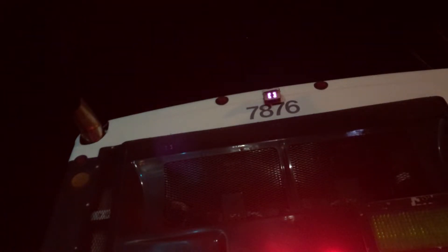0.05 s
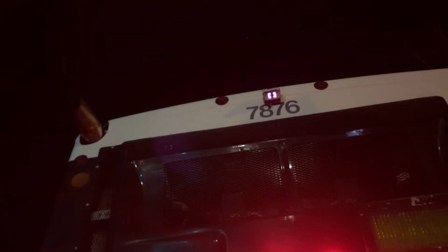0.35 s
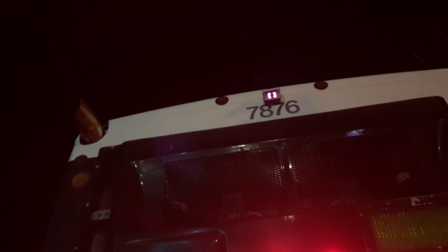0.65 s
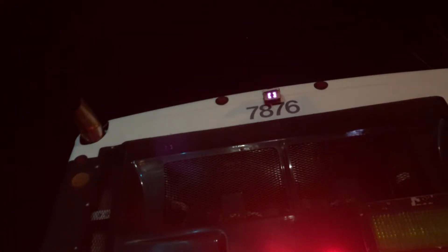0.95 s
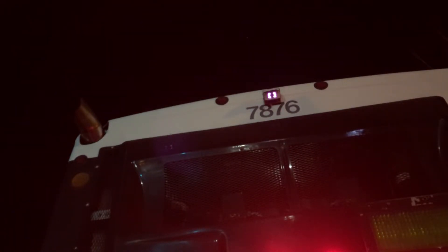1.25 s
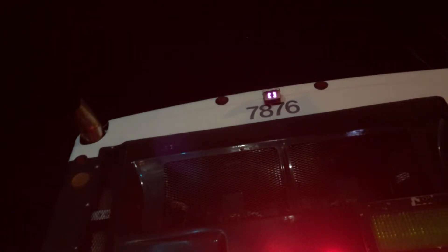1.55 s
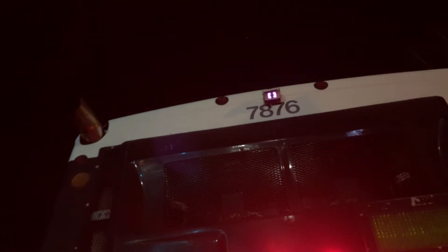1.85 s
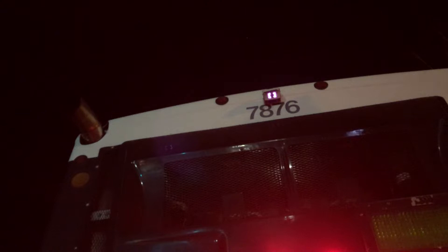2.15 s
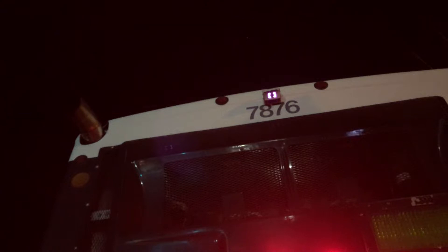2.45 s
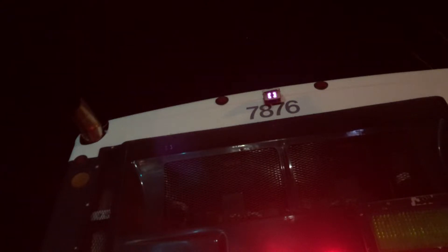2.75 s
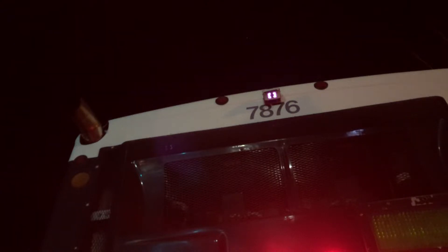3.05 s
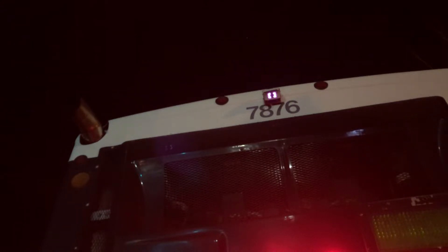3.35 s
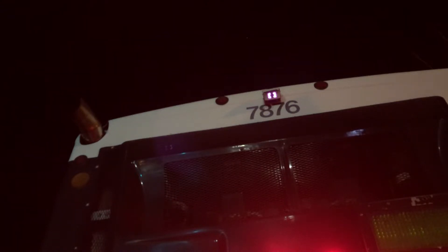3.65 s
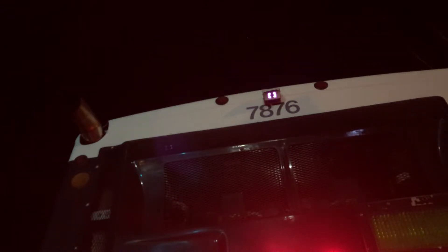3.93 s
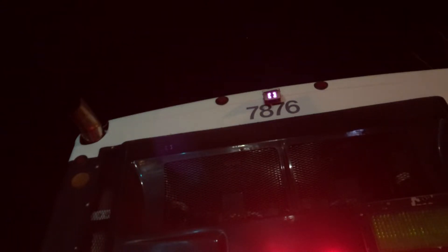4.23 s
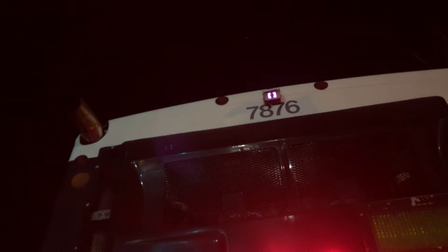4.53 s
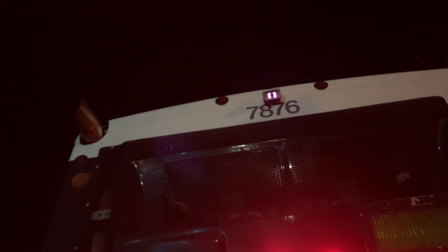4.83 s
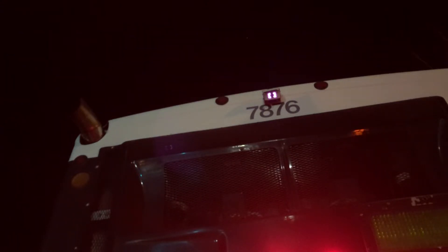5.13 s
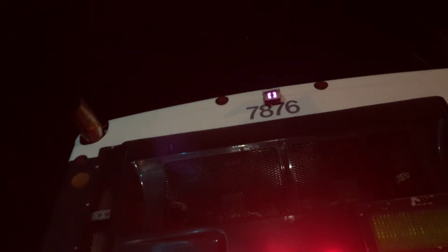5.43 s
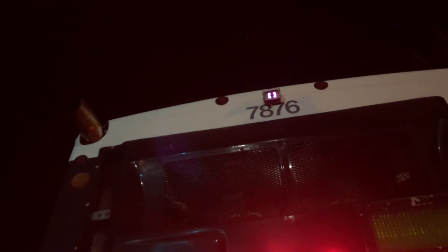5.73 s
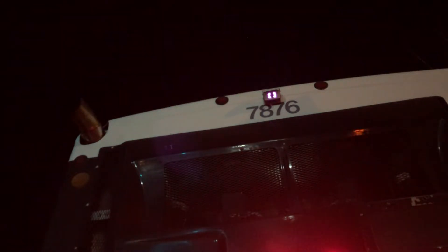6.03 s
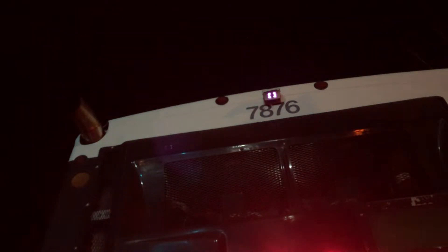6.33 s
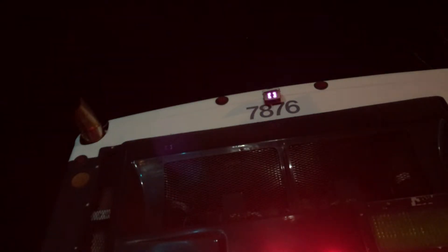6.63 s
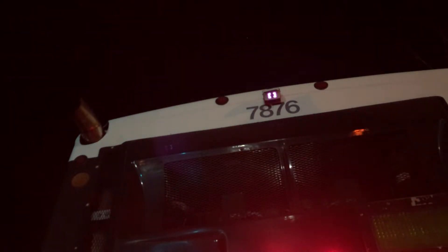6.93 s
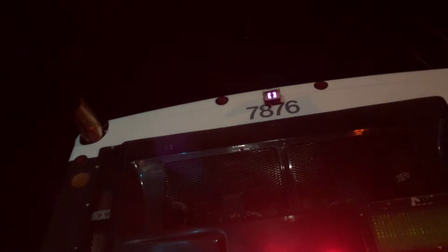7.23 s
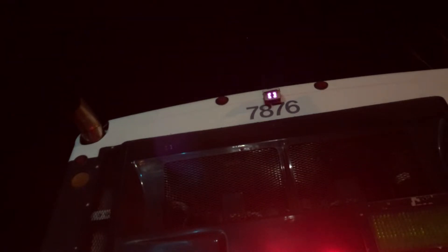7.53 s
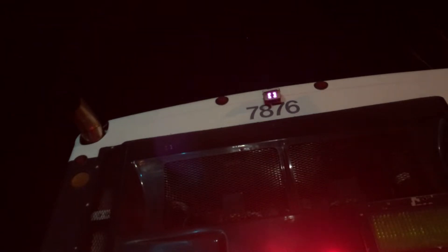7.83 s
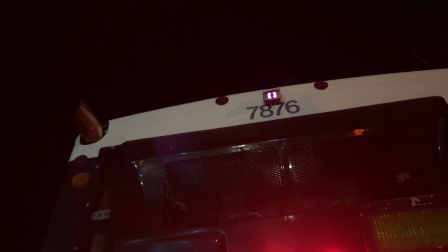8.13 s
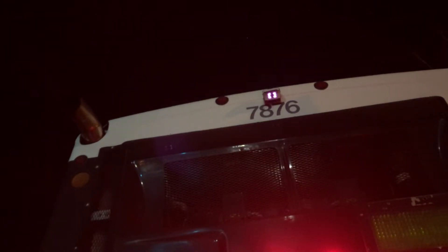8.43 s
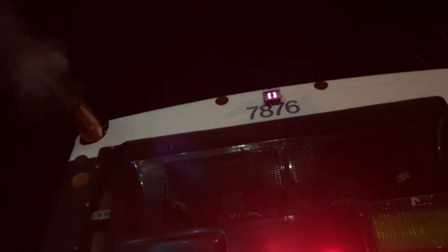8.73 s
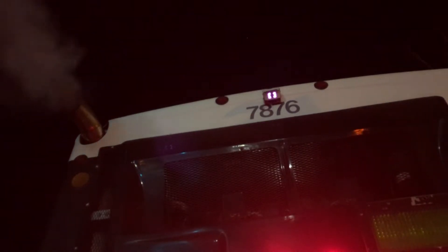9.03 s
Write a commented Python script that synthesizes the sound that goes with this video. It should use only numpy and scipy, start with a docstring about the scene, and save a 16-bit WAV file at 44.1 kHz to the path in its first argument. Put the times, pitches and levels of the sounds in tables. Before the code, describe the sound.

Faint distant traffic, then a starter slams in and grinds, and a bus's diesel engine fires, knocking and clattering as it speeds up.

```python
"""A quiet yard at night, close behind the engine bay of a cold diesel bus as it is started.
A few small clicks, then the starter slams in and grinds, its gear-mesh tone sagging under each compression.
The cylinders catch one by one and the engine runs up. Each firing is an impulse that excites resonators:
knocks ring the block, the exhaust thumps, gears clatter and gas spits. As the pulses quicken they merge
into a rising bass note."""
import sys
import numpy as np
from scipy import signal
from scipy.fft import rfft, irfft, next_fast_len
from scipy.io import wavfile
from scipy.ndimage import uniform_filter1d

SR = 44100
rng = np.random.default_rng(int(sys.argv[2]) if len(sys.argv) > 2 else 0)


def generate_wav(sig):
    """Save sig (samples, or channels by samples) to the path in sys.argv[1] as 16-bit PCM at SR."""
    pcm = np.round(np.clip(np.atleast_2d(sig).T, -1, 1) * 32767).astype(np.int16)
    wavfile.write(sys.argv[1], SR, pcm)


N = 400428
T = np.arange(N) / SR


def undb(db):
    """Decibels to amplitude ratio."""
    return 10 ** (np.asarray(db) / 20)

def unit(x):
    """Normalisation to rms 1."""
    return x / np.sqrt(np.mean(x ** 2))

def curves(table):
    """Linear interpolation of each column over time."""
    s, *columns = np.transpose(table)
    return [np.interp(T, s, c) for c in columns]

def between(start, stop, fade=0.013):
    """A gate with linear ramps."""
    return np.clip((T - start) / fade, 0, 1) * np.clip((stop - T) / fade, 0, 1)

def swell(peak_s, rise, fall):
    """A Gaussian hump with a separate width on each side."""
    return np.exp(-((T - peak_s) / np.where(T < peak_s, rise, fall)) ** 2)

def walk(rate):
    """Smooth random modulation of rms 1."""
    k = int(SR / rate)
    steps = np.repeat(rng.standard_normal(N // k + 1), k)
    return unit(uniform_filter1d(uniform_filter1d(steps, k), k)[:N])

def colour(x, spectrum):
    """Minimum-phase filtering by the folded cepstrum; output rms 1."""
    hz, db = np.transpose(spectrum)
    size = 2 * next_fast_len(N)
    f = np.maximum(np.arange(size // 2 + 1) * SR / size, 1)
    cepstrum = irfft(np.log(undb(np.interp(np.log(f), np.log(hz), db))))
    cepstrum[1:size // 2] *= 2
    cepstrum[size // 2 + 1:] = 0
    return unit(irfft(rfft(x, size) * np.exp(rfft(cepstrum)))[:N])

def noise(spectrum):
    """Turbulence as filtered Gaussian noise."""
    return colour(rng.standard_normal(N), spectrum)

def grit(spectrum, rate, spread_db):
    """Shot noise: dense tiny impacts of uneven size, filtered."""
    hits = (rng.random(N) < rate / SR) * rng.choice([-1, 1], N)
    return colour(hits * undb(spread_db * np.minimum(rng.standard_normal(N), 2)), spectrum)

def pulses(times, gains):
    """An impulse train."""
    return np.bincount(np.clip(np.asarray(times) * SR, 0, N).astype(int), gains, N + 1)[:N]

def bursts(hits, rise, decay):
    """Incoherent summation: each impulse opens an envelope, and their energies add."""
    t = T[:SR // 2]
    shape = (1 - np.exp(-(t / rise) ** 2)) * np.exp(-t / decay)
    return np.sqrt(np.abs(signal.fftconvolve(hits ** 2, (shape / shape.max()) ** 2)[:N]))

def cycles(hz, wander, rate):
    """Phase in cycles: the integral of a randomly wavering frequency."""
    return np.cumsum(hz * (1 + wander * walk(rate))) / SR

def harmonic(phase, k):
    """The k-th harmonic, at a random starting phase."""
    return np.sin(2 * np.pi * (k * phase + rng.random()))

def ring(hits, modes, rise, wander):
    """Modal resonance: blows feed damped modes, whose pitch and strength waver as the body shakes."""
    out = 0
    for hz, t60, db in modes:
        tone = harmonic(cycles(hz, wander, 70), 1)
        out = out + undb(db + 2 * walk(25)) * tone * bursts(hits, rise, t60 / np.log(1000))
    return out


# spectrum of distant traffic: frequency_hz, gain_db
TRAFFIC_SPECTRUM = [(13, -42), (22, -31), (49, 0), (82, -4), (121, 2), (168, -5), (233, -2.5), (352, -12),
                    (592, -10), (1870, -29), (2530, -41.5), (2990, -43.5), (3240, -44), (3520, -46),
                    (15500, -56.5)]
# drone of a far vehicle: time_s, pitch_hz, level_db
VEHICLE_DRONE = [(2.3, 342, -77), (2.43, 332, -46), (2.6, 318.5, -48), (2.76, 263, -50), (2.9, 235, -80)]
# thin electrical whine: time_s, level_db
WHINE_LEVELS = [(.38, -72), (.47, -81), (.6, -72), (4.6, -74), (5.9, -79)]

def yard(recede_db_per_s=.08, whine_hz=3143):
    """Superposed background sources: traffic, a narrow-band hum, a sinking drone and a pure whine."""
    traffic = noise(TRAFFIC_SPECTRUM)
    traffic *= undb(-44.5 - recede_db_per_s * T + .65 * walk(1.25) + .5 * walk(8.9))
    hum = noise([(400, -35.5), (560, -15), (592, .5), (625, -4), (850, -39), (3000, -83)]) * undb(-63)
    hz, db = curves(VEHICLE_DRONE)
    drone = np.sin(2 * np.pi * cycles(hz, .013, 39.6)) * undb(db + 3.1 * walk(34.95)) * between(2, 3.5)
    whine = np.sqrt(2) * np.sin(2 * np.pi * whine_hz * T) * undb(curves(WHINE_LEVELS)[0])
    return traffic + hum + drone + whine


# clicks and scuffs around the bus: start_s, level_db, decay_s, centre_hz
SMALL_IMPACTS = [(1.322, -61, 0.0028, 9000), (1.42, -69, 0.067, 2800), (1.508, -63.5, 0.031, 7500),
                 (2.179, -56, 0.022, 2600), (2.27, -75, .03, 7000), (3.683, -56, 0.02, 2780),
                 (3.749, -60, .025, 2600), (3.78, -68, .035, 6500), (4.452, -58, 0.024, 3200),
                 (4.515, -64, .03, 2800), (4.548, -66, 0.039, 7500)]

def clicks(tail_db=-17, tail_s=.072):
    """Brief contacts radiate broad bands of noise, each with a fast decay and a soft tail."""
    out = np.zeros(N)
    t = T[:SR // 2]
    f = np.maximum(np.fft.rfftfreq(len(t), 1 / SR), 1)
    for s, db, decay, hz in SMALL_IMPACTS:
        band_db = np.interp(np.log(f / hz), np.log([.25, .7, 1.3, 4.5]), [-17, 0, -2, -19])
        band = unit(irfft(rfft(rng.standard_normal(len(t))) * undb(band_db), len(t)))
        tail = undb(tail_db) * np.exp(-t / min(tail_s, 3 * decay))
        envelope = (1 - np.exp(-(3 * t / decay) ** 2)) * (np.exp(-t / decay) + tail)
        start = int(s * SR)
        out[start:start + len(t)] += undb(db) * band * envelope / envelope.max()
    return out


# modes of the switchgear housing: pitch_hz, t60_s, gain_db
SWITCH_MODES = [(2030, .09, -1), (2363, .15, 1), (2584, .15, -2), (2930, .15, -1), (3960, .12, -13),
                (4470, .12, -10), (4670, .1, -5)]

def switches(dull_below_hz=4000):
    """Impact excitation: the duller, heavier clacks also ring their housing."""
    s, db, _, hz = np.transpose(SMALL_IMPACTS)
    clacks = pulses(s, undb(db) * (hz < dull_below_hz))
    return undb(-7) * ring(clacks, SWITCH_MODES, rise=.0035, wander=.00296)


# solenoid, then pinion strikes: start_s, level_db, decay_s
PINION_STRIKES = [(5.951, -36, 0.0058), (5.966, -35, 0.028), (5.996, -19.5, 0.019)]
# spectrum of those strikes: frequency_hz, gain_db
CLASH_SPECTRUM = [(88, -50), (150, -23), (294, -5.5), (954, -6.5), (1130, -0.5), (1300, -11), (1570, -1),
                  (1700, -19), (2550, -11.5), (2750, -18), (15000, -25)]

def solenoid():
    """Impact transients: the solenoid snaps and throws the pinion into the flywheel."""
    envelope = sum(bursts(pulses([s], [undb(db)]), .001, decay) for s, db, decay in PINION_STRIKES)
    return noise(CLASH_SPECTRUM) * envelope


# response of the bell housing: frequency_hz, gain_db
HOUSING_RESPONSE = [(100, -17), (190, -5), (245, -1.5), (320, -2), (450, 4), (610, -2.5), (760, -2),
                    (1000, -6.5), (1500, -9.5), (2800, -11.5), (4500, -22), (9000, -40)]
# spectrum of grinding teeth: frequency_hz, gain_db
GRIND_SPECTRUM = [(24, -22), (40, -16), (145, -12.5), (182, -1), (239, -7.5), (338, -6.5), (392, -9.5),
                  (432, -7.5), (643, -6.5), (728, -8), (1490, -9.5), (2520, -16), (2920, -13), (4340, -22),
                  (15000, -52)]

def gear_mesh(hz, free_hz, phase, contact, full_hz=340, db_per_octave=9):
    """Source and filter: mesh harmonics sweep through the housing's resonances over grinding noise."""
    body_hz, body_db = np.transpose(HOUSING_RESPONSE)
    tone = sum(undb(np.interp(k * hz, body_hz, body_db) + 2.8 * walk(30)) * harmonic(phase, k)
               for k in range(1, 12))
    # engine bay echoes form a comb filter: each harmonic flares and fades as it glides
    tone = tone + .6 * np.roll(tone, int(.0049 * SR)) + .4 * np.roll(tone, int(.0131 * SR))
    tone *= undb(db_per_octave * np.minimum(np.log2(free_hz / full_hz), 0))  # weak until up to speed
    tone /= np.std(tone[(T > 6) & (T < 7.1)])
    grind = colour(contact * rng.standard_normal(N), GRIND_SPECTRUM)
    return undb(-3) * (tone + undb(-1) * grind)


# spectrum of the motor brushes: frequency_hz, gain_db
BRUSH_SPECTRUM = [(2500, -37), (5000, 4), (7000, 1.5), (9200, 5), (10100, -9), (10550, -16), (11000, -4),
                  (11600, 0), (15000, -2)]

def brush_hiss():
    """Sliding friction: the brushes hiss, with a narrow whistling band."""
    whistle = noise([(9000, -51), (10400, -9), (10550, -15), (10700, -9), (12000, -50)])
    return undb(-2) * noise(BRUSH_SPECTRUM) + undb(-11.5) * whistle

def rocking():
    """A mass on springs: the engine lurches on its mounts when first turned, then rocks gently."""
    lurch = bursts(pulses([6.02], [undb(-32)]), rise=.022, decay=.072)
    return noise([(40, -9), (70, -7.5), (130, -2), (200, 0), (600, -60)]) * (lurch + undb(-40.5))


# course of the starter: time_s, unloaded_mesh_hz, gear_gain_db, brush_gain_db
STARTER_COURSE = [(5.97, 120, -40, -44), (6.05, 175, -27.5, -50), (6.14, 200, -24.5, -45),
                  (6.21, 220, -26, -43.5), (6.28, 300, -25, -42), (6.56, 340.8, -24.3, -39),
                  (7.04, 350.2, -24.3, -38), (7.15, 300, -35.5, -48), (7.37, 545, -38, -47),
                  (7.45, 420, -38, -47)]
# compressions that load it: slowest_s, speed_loss_fraction, groan_db, groan_half_width_s
COMPRESSION_LOADS = [(6.2, .1, -29, .04), (6.452, .29, -25, .04), (6.675, .32, -22, .018),
                     (6.88, .32, -21, .02), (7.085, .3, -23.5, .018)]
# pinion rattles as the engine overruns it: peak_s, gain_db, rise_s, fall_s
OVERRUN_RATTLES = [(7.208, -24.5, .018, .04), (7.408, -21, .045, .028), (7.54, -20.5, .042, .034)]

def starter(squeeze_s=.07, release_s=.03, groan_lead_s=.031, slack_lag_s=.024):
    """A motor under periodic load: its mesh frequency sags at each compression, then it freewheels."""
    free_hz, gear_db, brush_db = curves(STARTER_COURSE)
    hz = free_hz * (1 - sum(loss * swell(s, squeeze_s, release_s) for s, loss, _, _ in COMPRESSION_LOADS))
    phase = cycles(hz, .005, 90)
    contact = unit(1 + .32 * np.cos(2 * np.pi * phase))  # pressure peaks once per tooth
    gears = gear_mesh(hz, free_hz, phase, contact)
    brushes = brush_hiss()
    # past the compression the piston springs ahead and the teeth go slack
    slack_db = -9 * sum(swell(s + slack_lag_s, .034, .017) for s, *_ in COMPRESSION_LOADS[:-1])
    drive = (gears * undb(gear_db) + brushes * undb(brush_db)) * undb(slack_db)
    strain = sum(undb(db) * swell(s - groan_lead_s, half, half) for s, _, db, half in COMPRESSION_LOADS)
    groan = np.sqrt(2) * np.sin(2 * np.pi * phase) * strain
    cranking = (drive + groan + rocking()) * between(5.96, 7.18)
    rattle = contact * grit(CLATTER_SPECTRUM, rate=3000, spread_db=2)
    freewheel = undb(-3.5) * gears + undb(-5) * rattle + undb(-14.5) * brushes
    overrun = sum(undb(db) * swell(s, rise, fall) for s, db, rise, fall in OVERRUN_RATTLES)
    return cranking + freewheel * overrun


# jolts from hard firings: start_s, level_db
COVER_JOLTS = [(7.762, -30), (8.022, -25), (8.293, -22.5), (8.362, -27.5), (8.425, -28)]
# modes of a loose cover: pitch_hz, t60_s, gain_db
COVER_MODES = [(3900, 0.094, -6.5), (4070, 0.12, -1), (4200, .08, -2), (4400, 0.11, -7.5)]

def clanks():
    """Free vibration: a loose cover rings on after each jolt."""
    s, db = np.transpose(COVER_JOLTS)
    return ring(pulses(s, undb(db)), COVER_MODES, rise=.0034, wander=.008)


# response of the silencer: frequency_hz, gain_db
SILENCER_RESPONSE = [(25, 0), (55, 1.5), (85, -6), (112, -19), (140, -9), (172, -0.5), (225, -5), (280, -2),
                     (320, -25), (370, -15), (450, -22)]
# spectrum of the turning engine: frequency_hz, gain_db
RUMBLE_SPECTRUM = [(30, -49), (50, -4), (90, 2), (165, 3), (235, -7.5), (280, -8.5), (340, -5), (460, -1.5),
                   (600, -4), (750, -9.5), (1050, -12.5), (1500, -28.5), (3000, -37), (8000, -57)]

def running(boom_hz=282, reference_hz=56):
    """Periodic exhaust pulses form a harmonic series; it grows with speed, as do rumble and rattle."""
    s = firings()[0]
    firing_hz = uniform_filter1d(1 / np.diff(s), size=3, mode="nearest")
    hz = 2 * np.interp(T, (s[:-1] + s[1:]) / 2, firing_hz)  # two pulses per loud firing
    octaves = np.log2(hz / reference_hz)
    phase = np.cumsum(hz) / SR
    pipe_hz, pipe_db = np.transpose(SILENCER_RESPONSE)
    note = sum(undb(np.interp(k * hz, pipe_hz, pipe_db)) * harmonic(phase, k) for k in range(1, 9))
    note *= undb(-22.5 + 13 * octaves)
    # faster pulses keep one chamber of the silencer booming
    boom = np.sin(2 * np.pi * cycles(boom_hz, .01, 40)) * undb(-19.5 + 38 * octaves + 2 * walk(30))
    clatter = grit(CLATTER_SPECTRUM, rate=3000, spread_db=3.1)
    rattle = unit(undb(6.5) * clatter + noise(GAS_SPECTRUM)) * undb(-23.5 + 9 * octaves)
    rumble = noise(RUMBLE_SPECTRUM) * undb(-15.3 + 10.2 * octaves)
    return (note + boom + rumble + rattle) * between(7.16, 10)


# spectrum of escaping gas: frequency_hz, gain_db
GAS_SPECTRUM = [(1000, -27), (3000, -5.5), (4400, 1), (5400, 0), (6300, -2.5), (7600, -2.5), (10000, -7),
                (13000, -10.5), (16000, -14.5)]

def gas_spit(puffs):
    """Turbulent flow: each puff of gas is a burst of rough hiss."""
    return grit(GAS_SPECTRUM, rate=12000, spread_db=5.4) * bursts(puffs, rise=.019, decay=.013)


# spectrum of rattling metal: frequency_hz, gain_db
CLATTER_SPECTRUM = [(400, -19.5), (1000, -1), (1500, 3), (1950, 0.5), (2300, 1), (2900, -5), (3500, -3.5),
                    (4200, -12), (5000, -18), (9000, -19)]
# modes of valve cover and injector lines: pitch_hz, t60_s, gain_db
VALVE_MODES = [(2270, 0.054, -3), (2382, 0.12, -5), (2925, 0.16, -7.5), (3210, .1, -13), (4020, 0.17, -8),
               (4370, 0.073, -5)]

def valve_clatter(shakes):
    """Impact noise: the shaken valve gear rattles, and thin metal parts resonate."""
    rattle = grit(CLATTER_SPECTRUM, rate=4000, spread_db=2.4) * bursts(shakes, rise=.006, decay=.02)
    return undb(-2) * rattle + undb(-7) * ring(shakes, VALVE_MODES, rise=.0069, wander=.012)


# modes of the exhaust pipe: pitch_hz, t60_s, gain_db
PIPE_MODES = [(111.6, 0.086, -10), (150.9, 0.081, -2.5), (178.3, 0.065, -1.5), (284.7, 0.089, -9)]

def exhaust_thump(blows):
    """Air-column resonance: each pressure pulse excites the low modes of the pipe."""
    return undb(-1) * ring(blows, PIPE_MODES, rise=.0076, wander=.0701)


# modes of block and panels: pitch_hz, t60_s, gain_db
BLOCK_MODES = [(451.6, 0.27, -13.5), (519.4, 0.12, -7), (590, 0.094, 0.5), (639, 0.084, -6),
               (712, 0.098, -18), (904, 0.12, -8), (1024, 0.11, -11), (1124, 0.069, -13), (1350, .1, -16.5),
               (1740, 0.14, -18), (2196, 0.035, -10.5)]
# spectrum of the combustion crack: frequency_hz, gain_db
CRACK_SPECTRUM = [(150, -13.5), (380, -3), (600, 4.5), (760, -5), (1100, -5), (1500, -14), (3000, -21.5),
                  (8000, -43.5)]

def block_knock(knocks):
    """Structure-borne sound: each blow gives a broadband crack and rings the casting."""
    crack = grit(CRACK_SPECTRUM, rate=5000, spread_db=2.9) * bursts(knocks, rise=.0031, decay=.021)
    return undb(-7.5) * ring(knocks, BLOCK_MODES, rise=.003, wander=.013) + undb(-9.7) * crack


# uneven first firings: start_s, knock_db, thump_db, clatter_db, gas_db
FIRST_FIRINGS = [(7.181, -14, -20, -23.5, -28), (7.287, -18.5, -16, -31, -26),
                 (7.364, -13.5, -33, -27.5, -33), (7.482, -22.5, -39, -23.5, -34),
                 (7.564, -10, -33, -40, -45), (7.662, -12.5, -17.5, -26, -29.5), (7.761, -9, -18, -23, -30),
                 (7.848, -17, -22, -22, -30), (7.942, -3, -15.5, -19.5, -26.5), (8.019, -9, -18, -21, -27),
                 (8.09, -21, -17, -28, -27.5), (8.157, -12.5, -22, -26, -25)]
# loud cylinders, of which the first two alternate in the run-up: knock_db, thump_db, clatter_db, gas_db
LOUD_CYLINDERS = [(-1, -14, -20, -24.5), (-6.5, -18, -17, -24.5), (-4.5, -13.5, -21, -23),
                  (-4.5, -17, -19, -23.5)]

def firings(count=18, run_up_s=8.23, first_gap_s=.0657, gap_ratio=.9593, ease_db_per_s=2.2):
    """Columns of all loud firings: uneven at first, then with gaps in geometric progression."""
    k = np.arange(count)
    elapsed = first_gap_s * (1 - gap_ratio ** k) / (1 - gap_ratio)
    knock, thump, clatter, gas = np.array(LOUD_CYLINDERS)[k % 2].T
    knock = knock - ease_db_per_s * elapsed  # softer as the burn evens out
    return np.hstack([np.transpose(FIRST_FIRINGS), [run_up_s + elapsed, knock, thump, clatter, gas]])

def all_cylinders(s, db):
    """Interleaved impulse trains: colder cylinders fire midway between loud ones and gain strength."""
    midway = (s[:-1] + s[1:]) / 2
    weak_db = np.interp(midway, [7.2, 8.3, 9.0], [-17, -12, -3])
    return pulses(np.r_[s, midway], undb(np.r_[db, db[:-1] + weak_db]))

def engine(slap_lag_s=.0172, thump_lead_s=.006, gas_lead_s=.007):
    """Impulsive excitation: combustion drives the block, the pipe, the valve gear and a spit of gas."""
    s, knock_db, thump_db, clatter_db, gas_db = firings()
    # at low speed the burn is lazy: a softer blow, then the pistons slap back
    lazy = np.interp(s, [8.05, 8.3], [1, .1])
    slaps = pulses(s + slap_lag_s, lazy * undb(knock_db - 3))
    block = block_knock(all_cylinders(s, knock_db - 5 * lazy) + slaps)
    pipe = exhaust_thump(all_cylinders(s - thump_lead_s, thump_db))
    valves = valve_clatter(pulses(s, undb(clatter_db)))
    return block + pipe + valves + gas_spit(pulses(s - gas_lead_s, undb(gas_db)))

def reflections(x, t60=.55, wet_db=-13):
    """Reverberation: the ground and parked vehicles return a short, dull tail."""
    t = T[:SR // 2]
    tail = signal.sosfilt(signal.butter(1, 3500, fs=SR, output="sos"), rng.standard_normal(len(t)))
    tail = tail * np.exp(-np.log(1000) * t / t60) * (t > .008)
    return x + undb(wet_db) * signal.fftconvolve(x, tail / np.linalg.norm(tail))[:N]

def scene():
    """Superposition of the bus, its reflections and the yard, in mono."""
    bus = solenoid() + starter() + engine() + clanks() + running() + clicks() + switches()
    return (reflections(bus) + yard())[None]

def record(dry, bass_hz=42, top_hz=15750):
    """Band limiting and saturation: the microphone sheds deep bass, rounds peaks and cuts the top."""
    thin = signal.sosfilt(signal.butter(4, bass_hz, "high", fs=SR, output="sos"), dry)
    rounded = thin / (1 + thin ** 6) ** (1 / 6)
    return signal.sosfilt(signal.ellip(10, .2, 70, top_hz, fs=SR, output="sos"), rounded)


dry = scene()
out = record(dry)
generate_wav(out)
```